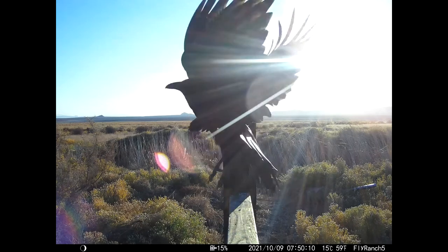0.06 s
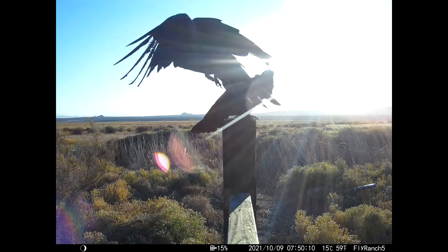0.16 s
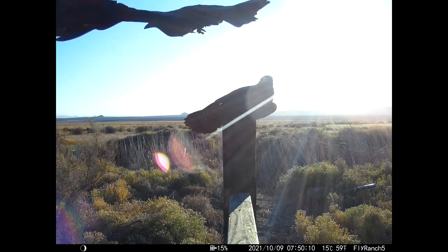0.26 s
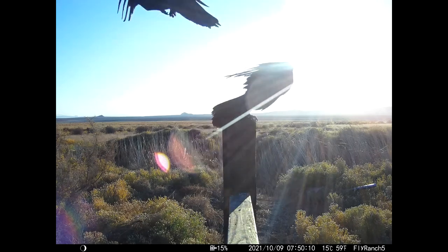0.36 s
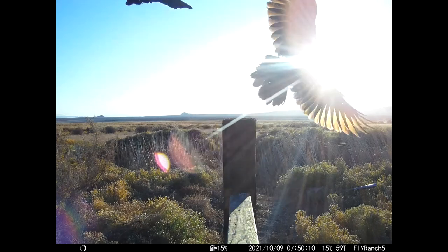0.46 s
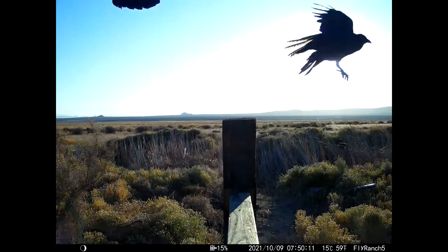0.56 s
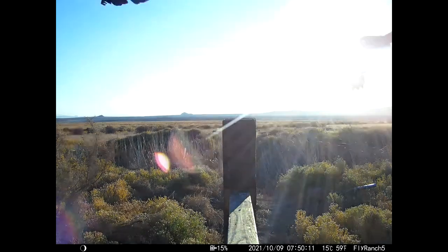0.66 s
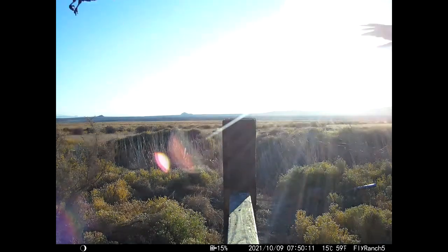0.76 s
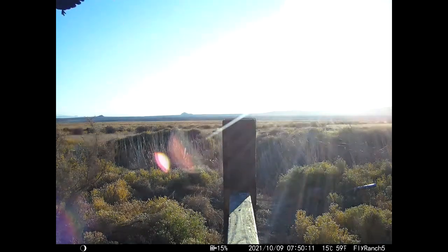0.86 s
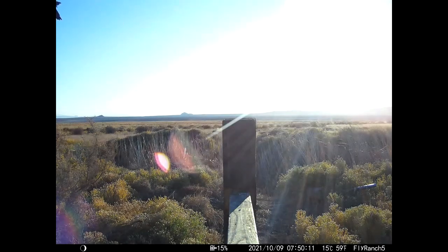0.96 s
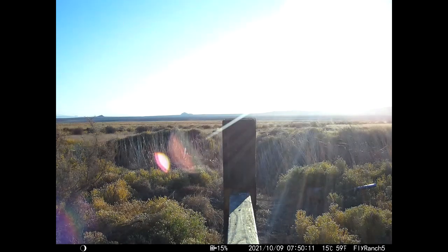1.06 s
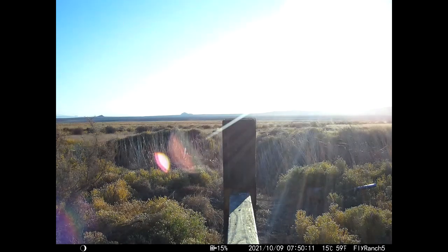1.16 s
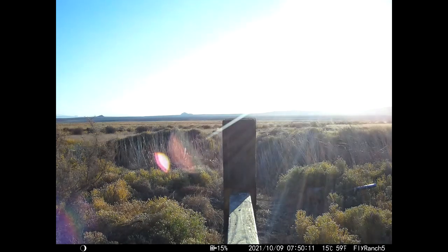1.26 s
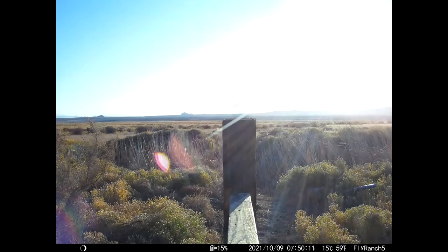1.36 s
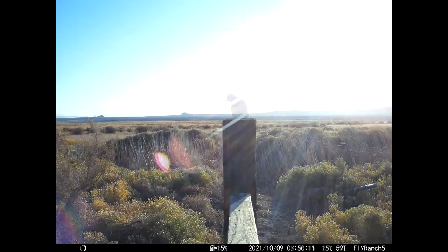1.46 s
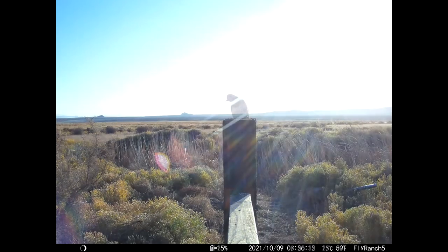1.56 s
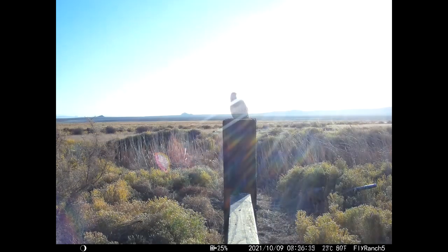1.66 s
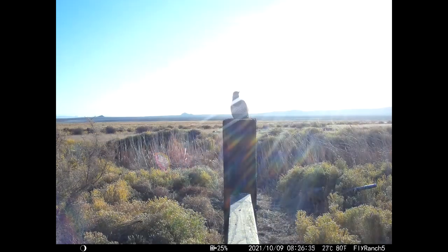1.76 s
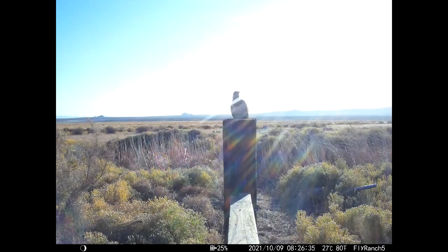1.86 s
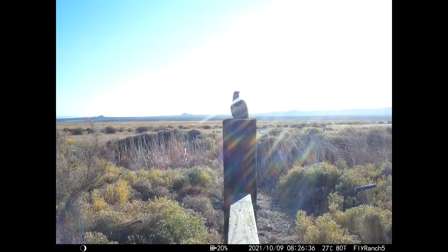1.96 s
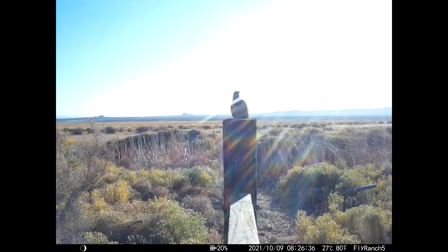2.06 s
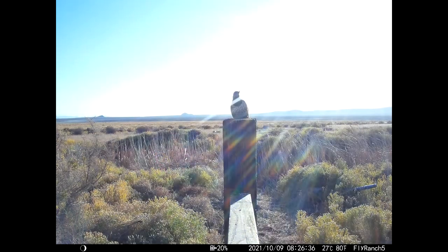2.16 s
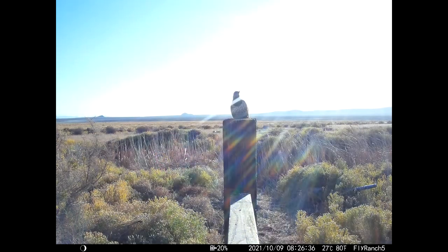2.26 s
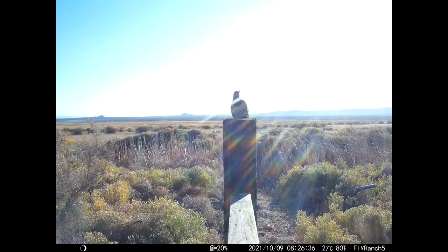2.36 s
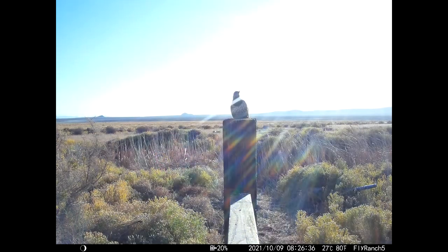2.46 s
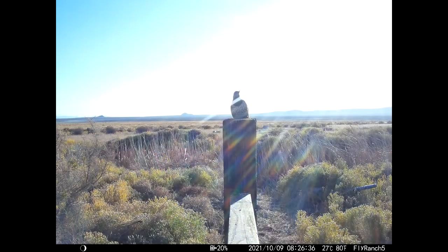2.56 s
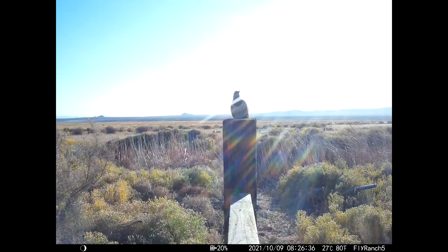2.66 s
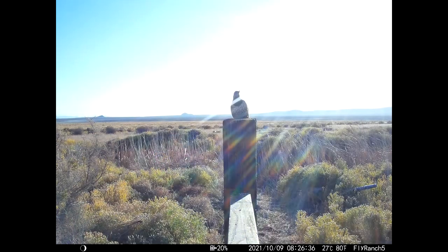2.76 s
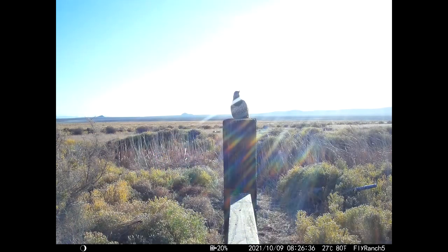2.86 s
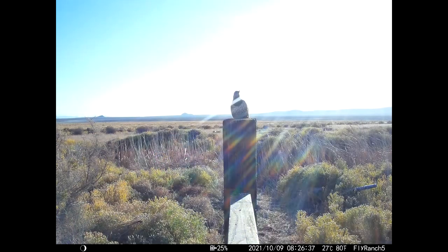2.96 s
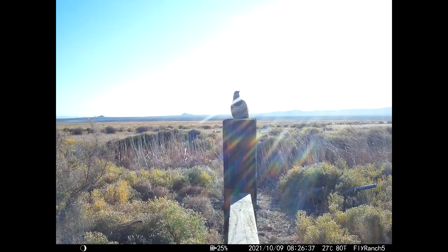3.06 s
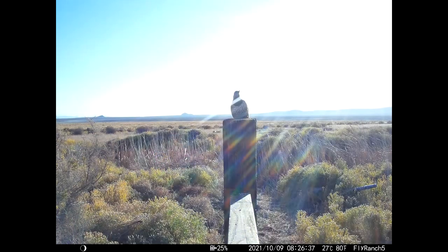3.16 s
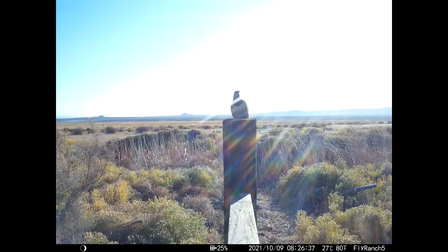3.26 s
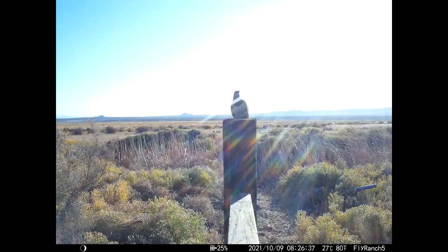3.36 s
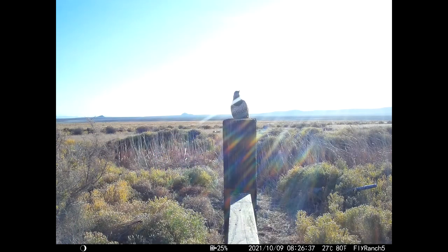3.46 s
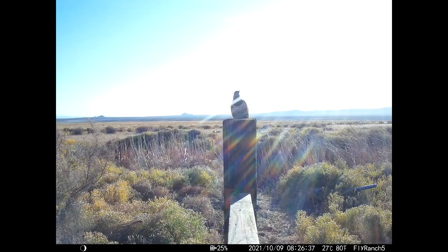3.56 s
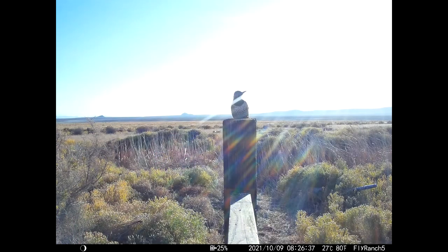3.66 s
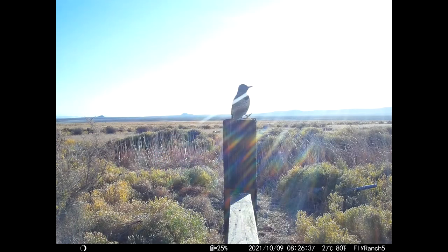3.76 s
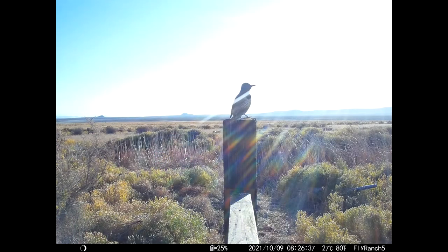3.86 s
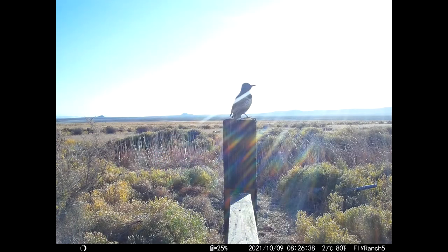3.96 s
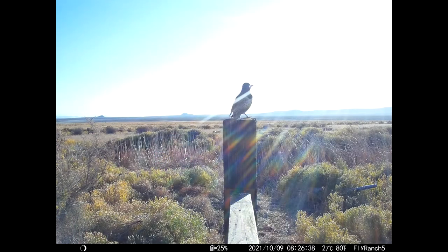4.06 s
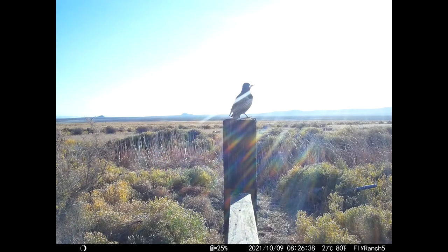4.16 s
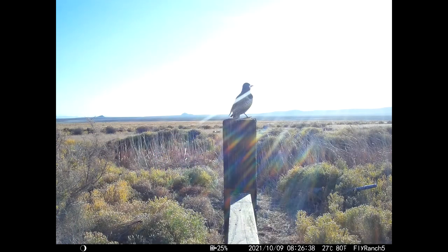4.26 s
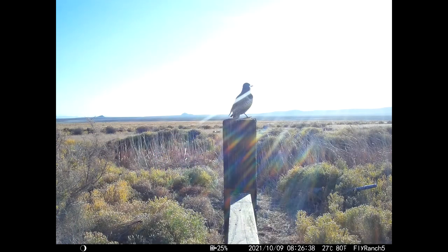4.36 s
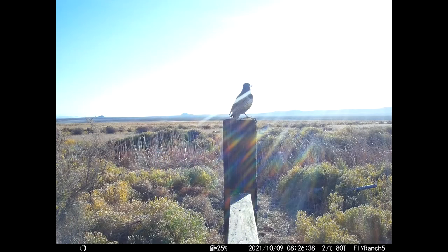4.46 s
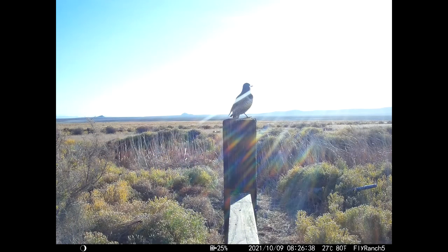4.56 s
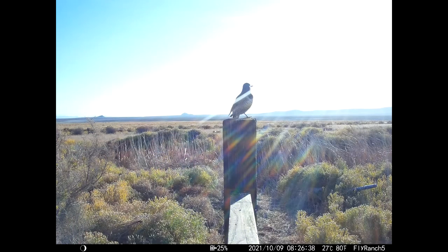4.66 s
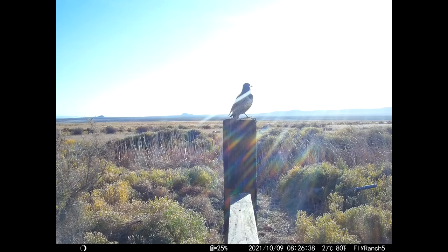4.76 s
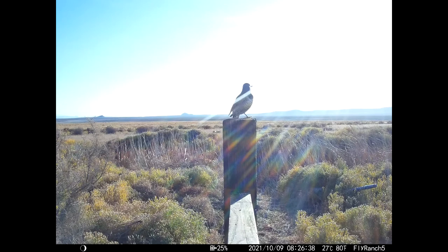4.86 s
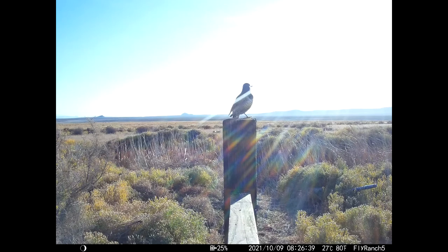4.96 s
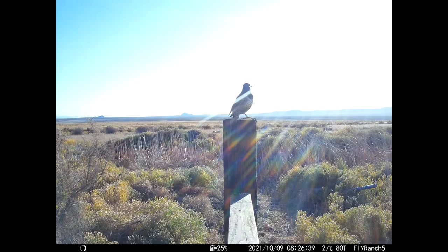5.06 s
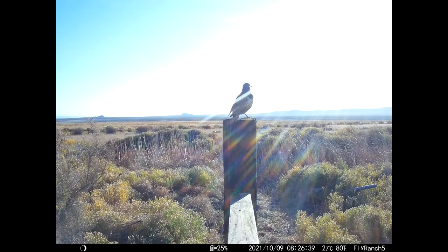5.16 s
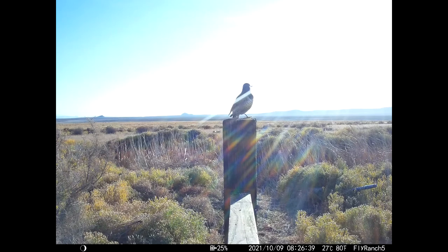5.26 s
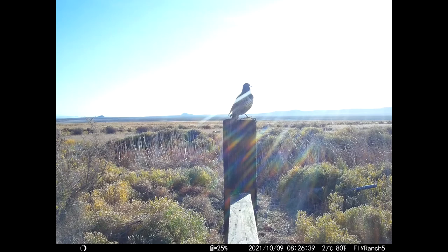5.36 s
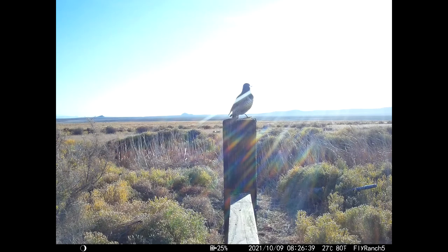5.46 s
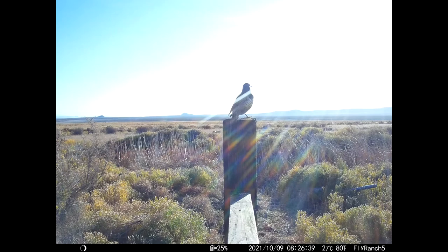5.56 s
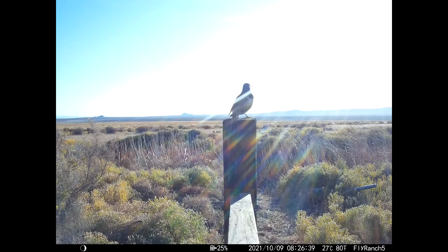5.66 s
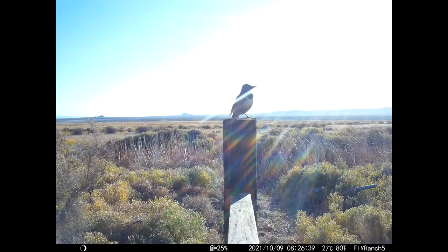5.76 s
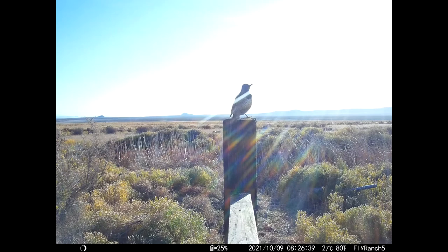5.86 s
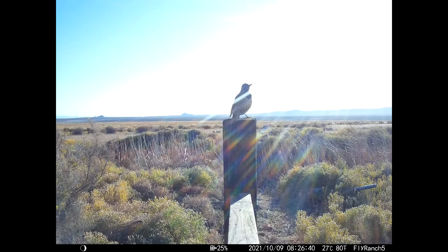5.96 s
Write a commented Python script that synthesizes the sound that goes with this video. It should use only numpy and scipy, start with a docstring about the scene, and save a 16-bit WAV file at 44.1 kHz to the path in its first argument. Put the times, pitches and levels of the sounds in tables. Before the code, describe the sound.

A large bird takes off with a sharp wing clap and fading wingbeats, then a songbird chirps and a distant raven caws faintly.

```python
"""Open scrubland, one microphone close to a wooden post. A large bird springs off the post with one sharp
clap of wing on body, then recedes in hard wingbeats: air swishes through the wing tips, feathers rub and
each stroke sheds a short hum. A gust buffets the microphone. Over the quiet air and a few distant pips,
a raven far away gives five rasping caws, and a songbird adds falling whistles and a thin chirp from both
sides of its syrinx."""
import sys
import numpy as np
from scipy import signal
from scipy.fft import rfft, irfft, next_fast_len
from scipy.io import wavfile
from scipy.ndimage import uniform_filter1d, map_coordinates

SR = 44100
rng = np.random.default_rng(int(sys.argv[2]) if len(sys.argv) > 2 else 0)


def materialize(psi):
    """Save the field psi as 16-bit PCM at rate SR to the path in sys.argv[1].

    A 1-D psi becomes a single channel; in a 2-D psi each row is a channel.
    """
    bounded = np.clip(np.atleast_2d(psi).T, -1, 1)
    quanta = np.round(bounded * 32767).astype(np.int16)
    wavfile.write(sys.argv[1], SR, quanta)


N = 265614


def amp(db):
    """Decibels to gain."""
    return 10 ** (np.asarray(db) / 20)


def unit(x):
    """Scale to rms 1."""
    return x / np.sqrt(np.mean(x ** 2) + 1e-20)


def clock():
    """The time of every sample."""
    return np.arange(N) / SR


def along(points, hz):
    """Read (Hz, value) points on a log frequency axis."""
    f, v = np.transpose(points)
    return np.interp(np.log(hz + 1), np.log(f + 1), v)


def swell(s, rise, fall=None):
    """A bell-shaped envelope around time s; rise and fall are the half lengths of its two sides."""
    fall = rise if fall is None else fall
    out = np.zeros(N)
    i = np.arange(max(0, int((s - 10 * rise) * SR)), min(N, int((s + 10 * fall) * SR)))
    t = i / SR - s
    out[i] = np.exp(-(t / (2 * np.where(t < 0, rise, fall))) ** 2)
    return out


def ruffle(s, attack, fade_db_per_s, hold=0):
    """An envelope that rises until time s, holds and fades."""
    t = clock() - s
    return np.where(t < 0, swell(s, attack), amp(-fade_db_per_s * np.maximum(t - hold, 0)))


def wobble(rate):
    """A smooth random curve, rate knots a second."""
    knots = rng.standard_normal(int(N * rate / SR) + 4)
    return unit(map_coordinates(knots, [clock() * rate]))


def filtered(x, response):
    """Filter x by a gain that is a function of frequency."""
    m = next_fast_len(N + SR // 2)
    return irfft(rfft(x, m) * response(np.fft.rfftfreq(m, 1 / SR)), m)[:N]


def coloured(x, spectrum):
    """Shape x by a spectrum, at rms 1."""
    return unit(filtered(x, lambda hz: amp(along(spectrum, hz))))


def patchy(x, depth_db):
    """Give x a colour that shifts at random over a few hundred Hz and a few tens of ms."""
    z = signal.stft(x, nperseg=512)[2]
    field = uniform_filter1d(rng.standard_normal(z.shape), size=3, axis=0)
    field = unit(uniform_filter1d(field, size=5, axis=1))
    return unit(signal.istft(z * amp(depth_db * field), nperseg=512)[1][:N])


def resonance(f, hz, width):
    """Causal response of one damped mode."""
    return 1j * f * width / (hz * hz - f * f + 1j * f * width)


def phase_of(hz):
    """Running phase of a moving frequency."""
    return 2 * np.pi * np.cumsum(hz) / SR


def snap(spectrum):
    """The shortest causal pulse with this spectrum, at peak 1."""
    log_gain = np.log(amp(along(spectrum, np.fft.rfftfreq(2048, 1 / SR))))
    cepstrum = irfft(log_gain)[:1024]
    cepstrum[1:] *= 2
    pulse = irfft(np.exp(rfft(cepstrum, 2048)))
    return pulse / np.abs(pulse).max()


def scatter(x, t60):
    """Diffuse answer of ground and bushes."""
    t = np.arange(SR // 2) / SR
    tail = rng.standard_normal(len(t)) * amp(-60 * t / t60) * (1 - np.exp(-t / 0.0036))
    return signal.fftconvolve(x, tail / np.linalg.norm(tail))[:N]


# Open air all around the microphone: f/Hz, level/dB
AIR_SPECTRUM = [(12, -31.5), (20, -4.5), (85, -2), (226, -8), (384, -12), (418, -9.5), (494, -13),
                (794, -16), (887, -16), (1310, -20.5), (1550, -21), (2170, -22), (8490, -23.5),
                (13300, -29.5), (15700, -32.5)]


def air(level_db=-61):
    """Quiet air and hiss over the scrub, wavering slightly in level and colour."""
    gain = amp(level_db + .3 * wobble(3))
    return gain * coloured(patchy(rng.standard_normal(N), depth_db=1.63), AIR_SPECTRUM)


# Wingbeats heading away from the microphone, about five a second:
# downstroke t/s, upstroke delay/s, then level/dB of downstroke, wing-tip flick, upstroke and rustle
BEATS = [(-0.008, 0.098, -47, -36, -38.5, -48.5), (.187, 0.098, -35, -30.5, -30, -35),
         (.374, 0.11, -31.5, -33, -31, -32.5), (.567, .113, -35.5, -40.5, -38.5, -38.5),
         (.768, 0.12, -42.5, -51, -44, -48.5), (.985, 0.12, -53.5, -56.5, -51.5, -55.5),
         (1.209, .107, -62, -64, -53, -60.5), (1.429, 0.12, -56.5, -64, -55.5, -56.5),
         (1.648, 0.11, -60.5, -74, -62.5, -60), (1.87, 0.12, -74, -86, -80, -69)]
DOWN_HALF_S, FLICK_DELAY_S, UP_RISE_S = .0095, .054, .016
FULL_STROKE_DB, CLAP_RUSTLE_DB = -30.5, -30.5


def strokes(trail_db=-7.5):
    """Envelopes of swish and rustle, summed in power: downstroke, flick of the wing tips, upstroke."""
    swish = np.zeros(N)
    rustle = (amp(-46.5) * ruffle(.35, attack=.33, fade_db_per_s=19.5)) ** 2  # never silent in flight
    for s, delay, down_db, flick_db, up_db, rustle_db in BEATS:
        down = amp(down_db) * swell(s, DOWN_HALF_S)
        flick = amp(flick_db) * swell(s + FLICK_DELAY_S, .011)
        up = amp(up_db) * swell(s + delay, UP_RISE_S, fall=.008)  # gathers speed and stops short
        swish += down ** 2 + flick ** 2 + up ** 2
        rustle += (amp(rustle_db) * ruffle(s, attack=.0077, fade_db_per_s=150, hold=.018)) ** 2
        rustle += (amp(-5) * flick) ** 2
        rustle += (amp(up_db - 5.5) * ruffle(s + delay, UP_RISE_S, fade_db_per_s=200)) ** 2
    rustle += (amp(CLAP_RUSTLE_DB) * ruffle(CLAP_S, attack=.0056, fade_db_per_s=190)) ** 2
    swish += amp(trail_db) ** 2 * rustle  # some air goes along with any rustle
    return np.sqrt(swish), np.sqrt(rustle)


# Air through the wing tips, close up: f/Hz, level/dB
SWISH_SPECTRUM = [(60, -23), (200, -11), (550, -1), (800, -8.5), (1300, -10), (1650, -3.5), (2300, -2.5),
                  (3200, -7.5), (4700, -8), (7000, -18), (10000, -28.5), (16000, -45.5)]
# Feather rubbing on feather, close up: f/Hz, level/dB
RUSTLE_SPECTRUM = [(100, -17), (500, -1.5), (1300, -13.5), (2500, -9.5), (4000, -7), (4700, -5),
                   (5400, -1.5), (7000, 0.5), (8200, -6.5), (10000, -19), (13000, -23), (16000, -32)]


def feathers(grain_db=3.5, flutter_db=1.53, catches_per_s=2500, shift_db=3, crisp_db=-17.5):
    """Air tears through the wing tips while barbs slide over each other in tiny catches."""
    swish, rustle = strokes()
    sizes = amp(grain_db * np.minimum(rng.exponential(size=N), 3))
    barbs = unit((rng.random(N) < catches_per_s / SR) * sizes * rng.standard_normal(N))
    # the colour of rustle and swish shifts at random from moment to moment
    friction = coloured(patchy(.7 * barbs + rng.standard_normal(N), shift_db), RUSTLE_SPECTRUM)
    rush = coloured(patchy(rng.standard_normal(N), shift_db), SWISH_SPECTRUM)
    flutter = unit(amp(flutter_db * wobble(260)))  # single feathers flick past
    # each downstroke fans the quills open with a crisp edge
    fanning = sum(amp(rustle_db + crisp_db) * swell(s, DOWN_HALF_S) for s, *_, rustle_db in BEATS)
    crisp = coloured(barbs, [(3000, -10), (9000, 0.5), (13000, -2.5), (16000, -11)])
    return flutter * (swish * rush + rustle * friction + fanning * crisp)


def vortices(down_hz=249.8, flick_hz=430, up_hz=488.7, unrest=.15, sag=.06, breath=.33):
    """Each stroke sheds a short unsteady hum that sinks as the wing slows: low down, higher back up."""
    # t/s, half length/s, f/Hz, level/dB
    hums = [(CLAP_S + .008, .0038, 429.4, -28.5)]  # the clap squeezes out a puff of air
    for s, delay, down_db, flick_db, up_db, _ in BEATS:
        hums += [(s - .01195, .006, down_hz, down_db - 1),  # a thump just ahead of the swish
                 (s + FLICK_DELAY_S, .011, flick_hz, -42.5 + .5 * (flick_db - FULL_STROKE_DB)),
                 (s + delay - .007, .016, up_hz, -45.5 + .5 * (up_db - FULL_STROKE_DB))]
    out, drift, t = np.zeros(N), wobble(330), clock()
    for s, half, hz, db in hums:
        near = np.abs(t - s) < 10 * half
        u = (t[near] - s) / half
        pitch = hz * np.exp(unrest * drift[near] - sag * np.clip(u, -3, 3))
        out[near] += amp(db) * np.exp(-(u / 2) ** 2) * np.sin(phase_of(pitch))
    return np.sqrt(2) * out * (1 + breath * wobble(300))


# Quill strikes at the post, close to the microphone: t/s, level/dB against the strongest
QUILL_STRIKES = [(0.0740, 0), (0.0742, -3), (0.0752, -1.5), (0.0759, -5), (0.0761, -11.5)]
# The colour of one strike: f/Hz, level/dB
QUILL_SPECTRUM = [(100, -19), (400, -3), (700, -3.5), (1250, -10.5), (1650, 2.5), (2500, 3.5), (3400, -4),
                  (4600, 2), (5400, -4), (7150, 4.5), (8200, -6.5), (8700, -20.5), (11000, -33),
                  (16000, -40.5)]
CLAP_S = QUILL_STRIKES[0][0]


def clap(peak=.95, scatter_db=-15, ground_s=.0094, ground_db=-20):
    """Wing meets body and quills strike in a tight cluster; the ground throws the crack back."""
    pulse, crack = snap(QUILL_SPECTRUM), np.zeros(N)
    for s, db in QUILL_STRIKES:
        crack[round(s * SR):][:len(pulse)] += amp(db) * pulse
    crack *= peak / np.abs(crack).max()
    echo = np.pad(crack, (round(ground_s * SR), 0))[:N]
    return crack + amp(ground_db) * echo + amp(scatter_db) * scatter(crack, t60=.03)


# Moving air right on the microphone: f/Hz, level/dB
RUMBLE_SPECTRUM = [(6, 4), (15, 5), (40, -3), (100, -7), (180, -13), (400, -27.5), (800, -35.5),
                   (1400, -43), (3000, -64.5)]
# A gust passing over it: t/s, level/dB
GUST_LEVELS = [(1.15, -63), (1.26, -54), (1.38, -40), (1.46, -42), (1.61, -35), (1.66, -46.5), (1.7, -45.5),
               (1.83, -60), (2.0, -68)]
# The gust's strongest eddies: t/s, half length/s, peak level/dB
GUST_EDDIES = [(1.363, 0.0042, -34), (1.384, 0.0026, -27), (1.407, 0.0025, -29.5), (1.583, 0.0015, -29),
               (1.611, 0.0025, -29), (1.696, 0.0023, -33.5)]


def buffet(wash_db=-46.5, wash_db_per_db=.36, wash_half_s=.03):
    """Air from the clap, each downstroke and a gust rumbles on the microphone; eddies thump softly."""
    s, db = np.transpose(GUST_LEVELS)
    power = amp(np.interp(clock(), s, db, left=-100, right=-100)) ** 2
    pushes = [(CLAP_S, CLAP_RUSTLE_DB)] + [(s, down_db) for s, _, down_db, *_ in BEATS]
    for s, db in pushes:
        wash = amp(wash_db + wash_db_per_db * (db - FULL_STROKE_DB))
        power += (wash * swell(s, wash_half_s)) ** 2
    out = np.sqrt(power) * coloured(rng.standard_normal(N), RUMBLE_SPECTRUM)
    for s, half, db in GUST_EDDIES:
        u = (clock() - s) / half
        out += amp(db) * (1 - u * u) * np.exp(-u * u / 2)
    return out


# Birds far out in the scrub: t/s, half length/s, f/Hz, level/dB
FAR_PIPS = [(2.097, 0.0052, 5180, -64.5), (5.019, .01, 1531, -71), (5.703, 0.0079, 1560, -68.5)]


def distant_birds():
    """Each pip is a brief pure tone."""
    return sum(amp(db) * swell(s, half) * np.sin(2 * np.pi * hz * clock())
               for s, half, hz, db in FAR_PIPS)


# A raven far from the microphone: t/s, length/s, top pitch f/Hz, level/dB, rasp/0-1
RAVEN_CAWS = [(2.523, 0.24, 580, -63.5, 0.3), (3.18, .28, 578, -64.5, .6), (3.875, 0.29, 568.6, -62, 0.58),
              (4.405, .28, 561.5, -62.5, 0.6), (5.11, 0.29, 586.5, -62, 0.72)]
# The resonance of its throat: f/Hz, level/dB
RAVEN_THROAT = [(500, -23), (800, -19), (950, -5), (1130, 0), (1400, -3.5), (1700, -9), (1950, -29),
                (3000, -42.5)]


def raven(rasp_hz=74, arch=.13, hoarse_db=-5, echo_db=-12, jitter_mid=.012, jitter_ends=.09, swing=.82):
    """Each caw arches in pitch; a slow second oscillation rasps it and chops the air into hoarse puffs."""
    out, jitter = np.zeros(N), wobble(350)
    rattle = phase_of(rasp_hz * (1 + .1012 * wobble(28)))
    puffs = coloured(rng.standard_normal(N) * (1 + np.cos(rattle)), RAVEN_THROAT)
    for s, length, hz, db, rasp in RAVEN_CAWS:
        u = np.clip((clock() - s) / length, 0, 1)
        edge = (2 * u - 1) ** 2  # 0 in mid-caw, 1 at both ends
        pitch = hz * (1 - arch * edge + rasp * (jitter_mid + jitter_ends * edge) * jitter)
        phase = phase_of(pitch) + swing * rasp * np.sin(rattle)
        voice = sum(amp(along(RAVEN_THROAT, k * pitch)) * np.sin(k * phase) for k in range(1, 5))
        voice *= np.sqrt(1 - edge) * (1 + rasp * np.sin(rattle))
        envelope = amp(db) * np.abs(np.sin(np.pi * u)) ** .27
        out += envelope * (voice + amp(hoarse_db) * puffs)
    return out + amp(echo_db) * scatter(out, t60=.16)


# A songbird out in the scrub: t/s, length/s, start f/Hz, end f/Hz, level/dB
FALLING_WHISTLES = [(2.676, 0.083, 5760, 4250, -60.5), (3.95, 0.074, 5130, 4550, -76),
                    (4.38, .115, 5800, 4250, -66.5)]
# Its chirp, sliding up and levelling off: t/s, lower voice f/Hz, level/dB
CHIRP_CONTOUR = [(2.754, 5700, -63), (2.764, 6017, -51.5), (2.784, 6528, -45), (2.806, 6522, -40),
                 (2.824, 6870, -46), (2.85, 6860, -67)]


def songbird(upper_ratio=1.13, upper_db=-13, thin_hz=9500, thin_db=-27, echo_db=-19):
    """Both sides of the syrinx sound in the chirp; the whistles are single falling tones."""
    t = clock()
    s, hz, db = np.transpose(CHIRP_CONTOUR)
    unsteady = 1 + .00505 * wobble(500)
    pitch = np.interp(t, s, hz) * unsteady
    voices = np.sin(phase_of(pitch)) + amp(upper_db) * np.sin(phase_of(upper_ratio * pitch))
    overtone_hz = thin_hz * np.sqrt(np.median(hz) / pitch)  # falls as the chirp rises
    voices += amp(thin_db) * np.sin(phase_of(overtone_hz))
    out = voices * amp(np.interp(t, s, db, left=-120, right=-120))
    for s, length, start_hz, end_hz, db in FALLING_WHISTLES:
        u = np.clip((t - s) / length, 0, 1)
        glide_hz = (start_hz + (end_hz - start_hz) * u) * unsteady
        out += amp(db) * np.sin(np.pi * u) * np.sin(phase_of(glide_hz))
    out *= amp(2.5 * wobble(250))  # the level flickers
    return np.sqrt(2) * (out + amp(echo_db) * scatter(out, t60=.23))


# Faint scuffs on the post, near the microphone: t/s, half length/s, f/Hz, bandwidth/Hz, level/dB
POST_SCUFFS = [(2.821, 0.024, 480, 650, -60.5), (3.765, 0.014, 6400, 3500, -66)]


def scuffs():
    """A perched bird scuffs the wood: short swells of noise in one band each."""
    out = np.zeros(N)
    for s, half, hz, width, db in POST_SCUFFS:
        band = filtered(rng.standard_normal(N), lambda f: resonance(f, hz, width) ** 2)
        out += amp(db) * swell(s, half) * unit(band)
    return out


def scene():
    """The take-off close by and the scrubland beyond, at one microphone."""
    take_off = feathers() + vortices() + clap()
    return (air() + take_off + buffet() + distant_birds() + raven() + songbird() + scuffs())[None]


def record(dry):
    """The camera keeps nothing above its band limit."""
    top_hz, edge_hz = 15750, 100
    return np.array([filtered(channel, lambda hz: np.clip((top_hz - hz) / edge_hz, 0, 1))
                     for channel in dry])


dry = scene()
out = record(dry)
materialize(out)
```